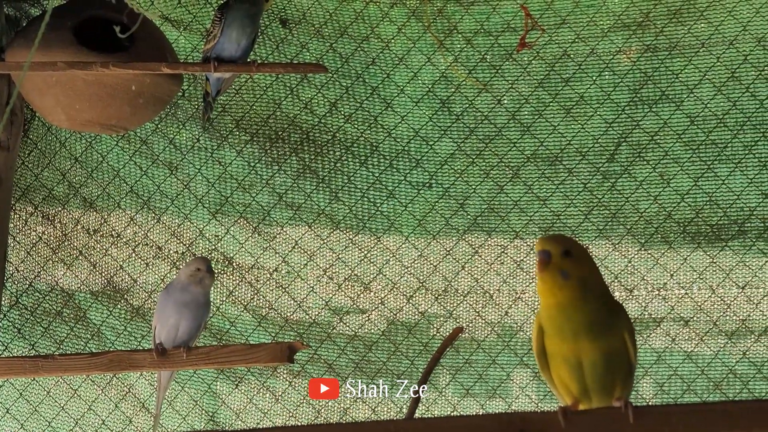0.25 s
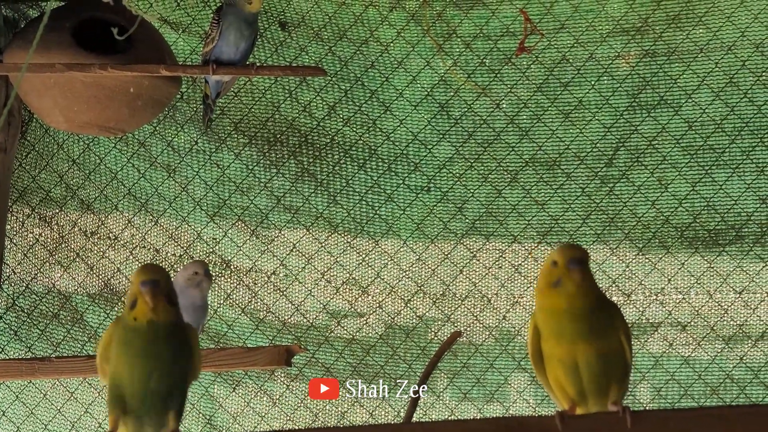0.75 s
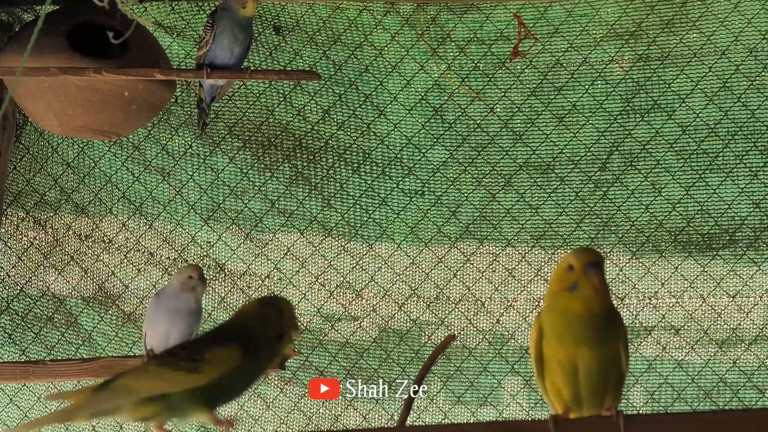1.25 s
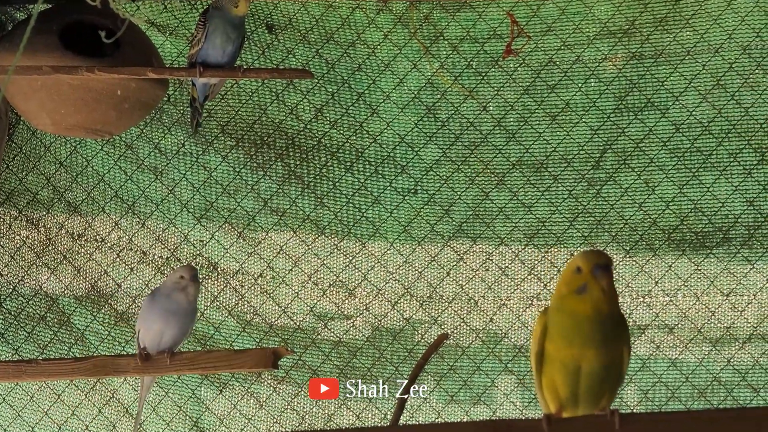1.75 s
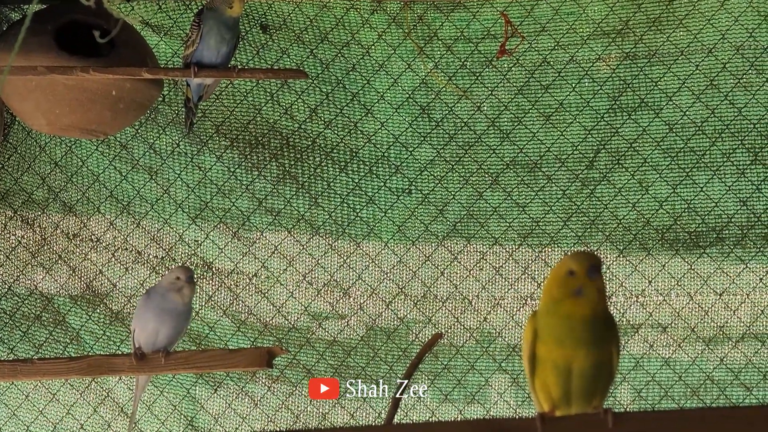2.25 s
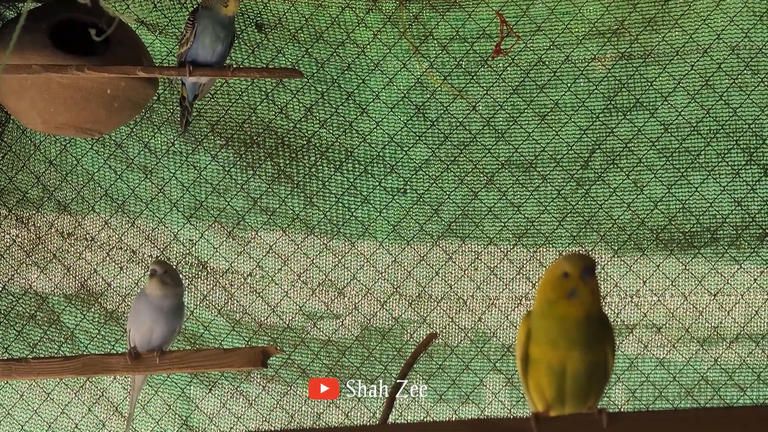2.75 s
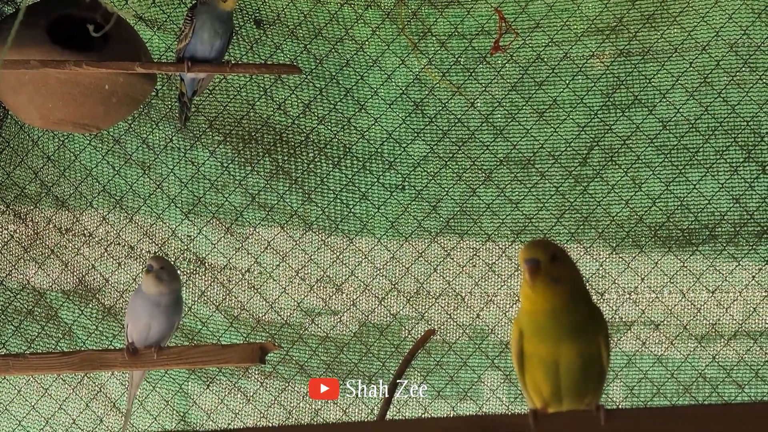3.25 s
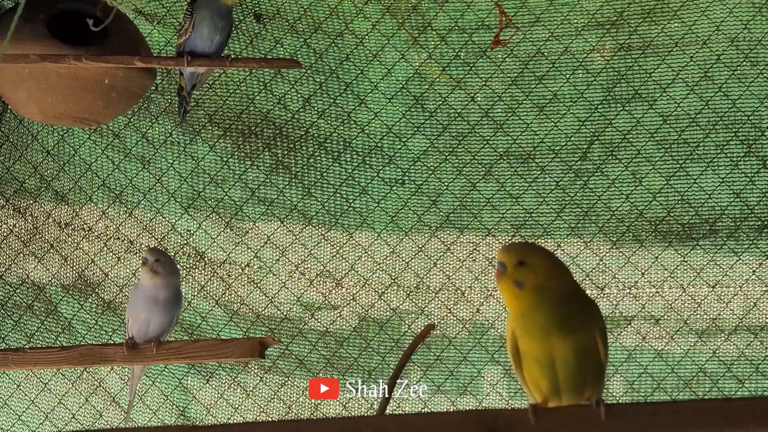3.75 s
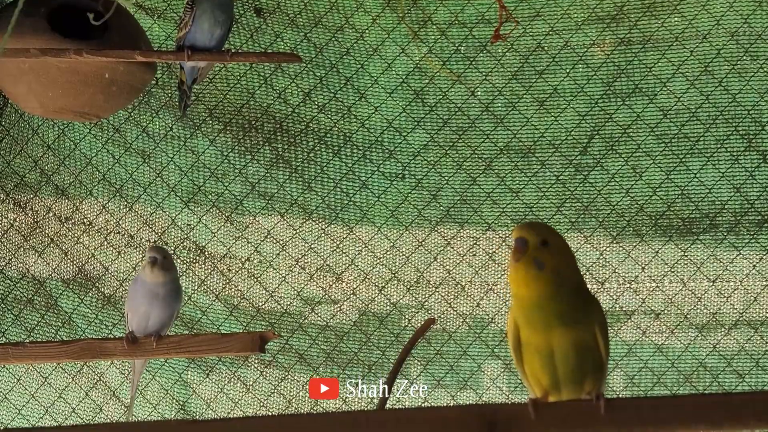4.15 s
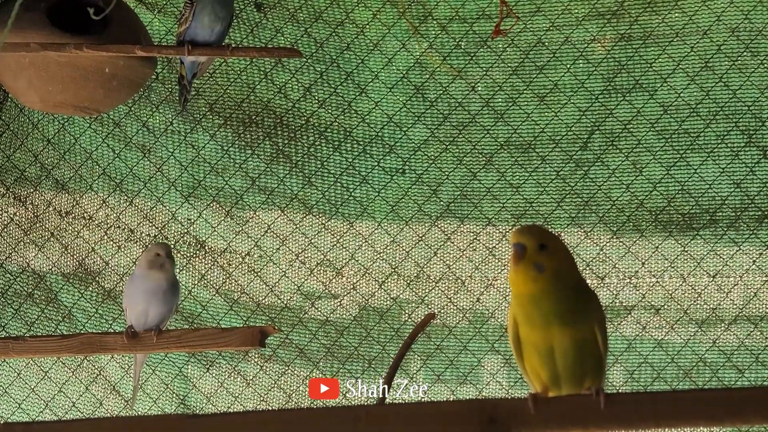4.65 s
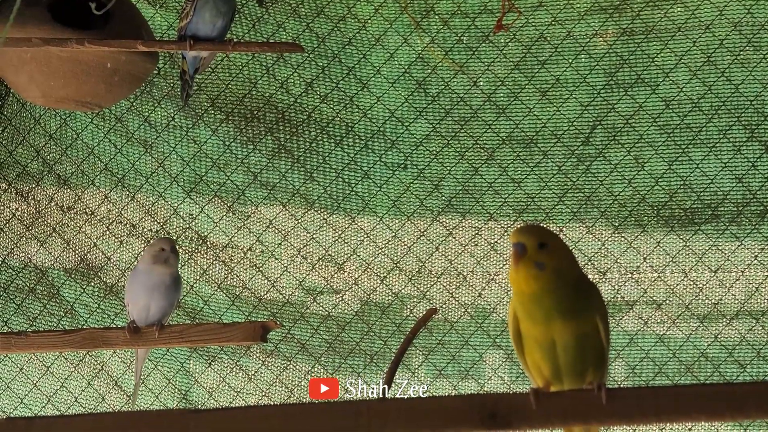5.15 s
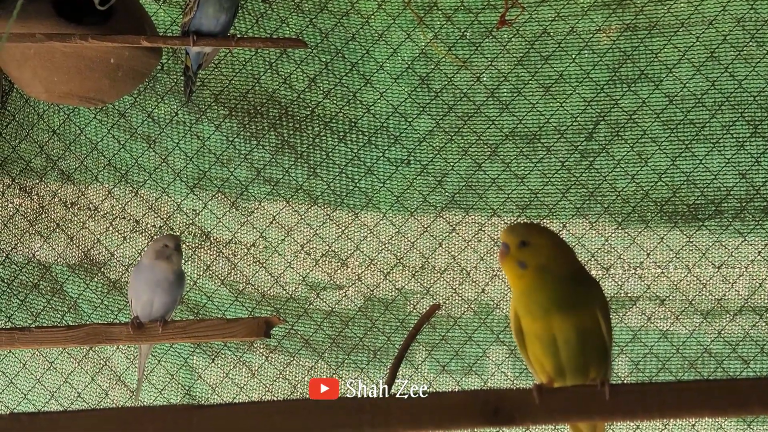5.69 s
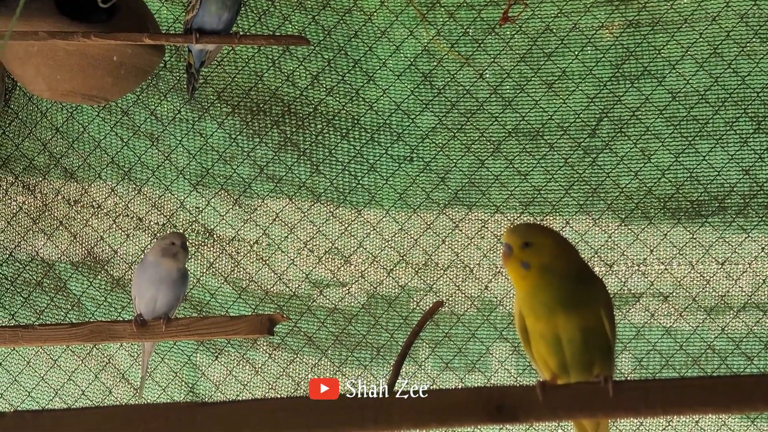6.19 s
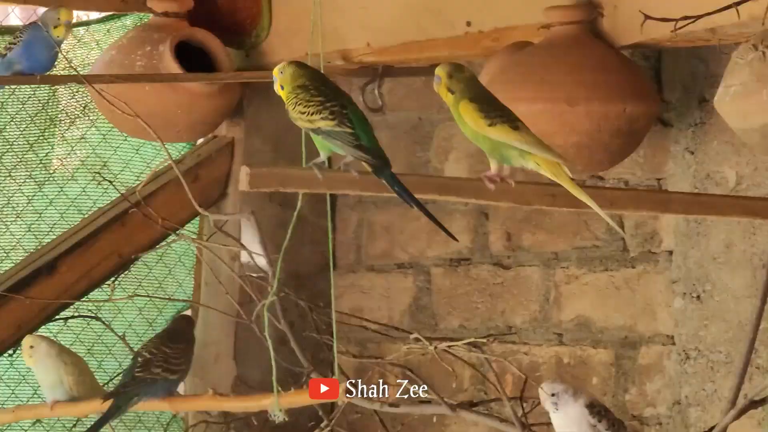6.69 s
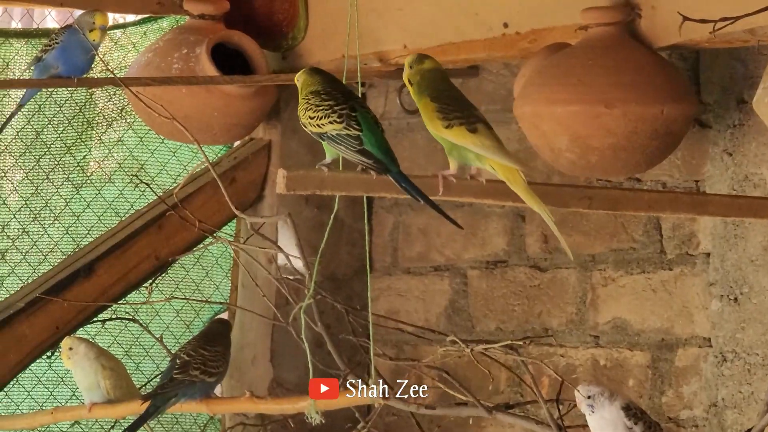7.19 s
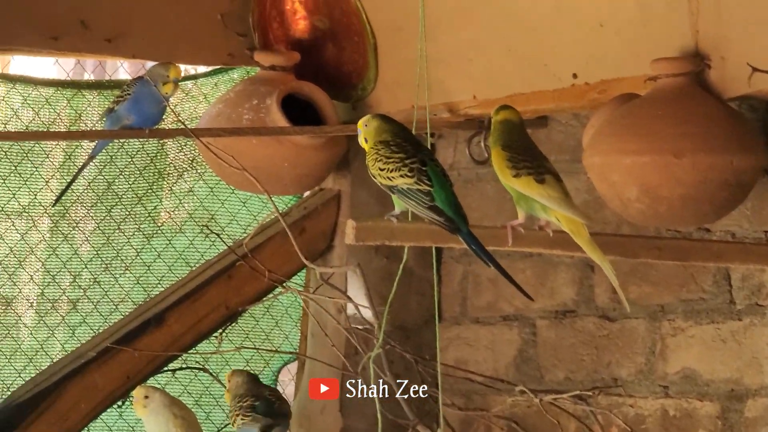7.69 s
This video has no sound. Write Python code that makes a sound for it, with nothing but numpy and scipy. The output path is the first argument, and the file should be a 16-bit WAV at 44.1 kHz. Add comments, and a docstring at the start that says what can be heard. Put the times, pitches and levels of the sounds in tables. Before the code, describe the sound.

Close, raspy budgerigar chirps come in two bursts, then thin out to distant chatter and a small bird's faint repeated piping.

```python
"""Budgerigars chirp close by in a netted aviary with brick walls.
Each chirp is a falling whistle that breaks into a rasp and clears into an arch; a few calls are
shriller squawks. Walls and perches throw them back. Other birds answer from further off, wings beat
and rustle, and a small bird pipes outside over a low outdoor rumble."""
import sys
import numpy as np
from scipy import signal
from scipy.fft import rfft, irfft, next_fast_len
from scipy.io import wavfile

SR = 44100
rng = np.random.default_rng(int(sys.argv[2]) if len(sys.argv) > 2 else 0)


def to_wav(sig):
    """Store sig (one row per channel, or 1-D mono) as 16-bit WAV at the path in sys.argv[1].

    Samples outside -1..1 are clipped; the rate is SR.
    """
    pcm = np.clip(np.atleast_2d(sig), -1, 1) * 32767
    pcm = np.round(pcm).astype(np.int16)
    wavfile.write(sys.argv[1], SR, pcm.T)  # frames by channels


N = 349713
TIME, FREQS = np.arange(N) / SR, np.fft.rfftfreq(N, 1 / SR)
PROGRESS = np.linspace(0, 1, 25)[1:-1]  # breakpoints along a note
# Resonances of a budgerigar's throat and beak: f/Hz, gain/dB
THROAT_EQ = [(900, -42), (1500, -17), (1950, 3), (2350, -1.5), (3000, 7), (4100, 0.5), (4900, -7),
             (6300, 3), (7600, -5.5), (9500, -6), (11000, -9), (13300, 6.5), (16000, 4)]


def amp(db):
    """Decibels to gain."""
    return 10 ** (np.asarray(db) / 20)


def unit(x):
    """Scales to rms 1."""
    return x / np.sqrt(np.mean(x ** 2) + 1e-20)


def read(points, hz):
    """Reads a spectrum on a log-frequency axis."""
    f, value = np.transpose(points)
    return np.interp(np.log(hz + 1), np.log(f + 1), value)


def follow(rows, t):
    """Reads every column of a breakpoint curve at the times t."""
    s, *columns = np.transpose(rows)
    return [np.interp(t, s, c) for c in columns]


def colour(x, gain):
    """Filters by a gain given at FREQS."""
    size = next_fast_len(N + 4096)
    curve = np.interp(np.fft.rfftfreq(size, 1 / SR), FREQS, gain)
    return irfft(rfft(x, size) * curve, size)[..., :N]


def wander(count, hz):
    """Smooth random motion of rms 1, up to about hz."""
    f = np.fft.rfftfreq(count, 1 / SR)
    return unit(irfft(rfft(rng.standard_normal(count)) * np.exp(-(f / hz) ** 2), count))


def add(mix, s, sound):
    """Mixes a sound in at time s."""
    part = mix[max(round(s * SR), 0):][:len(sound)]
    part += sound[:len(part)]


def arc(begin, middle, end):
    """A parabola through three values over the course of a note."""
    u = PROGRESS
    return begin + (end - begin) * u + 4 * u * (1 - u) * (middle - (begin + end) / 2)


def syrinx(gesture, overtones_db, flutter_hz=840, throb=0.37, jitter=0.0787, quiver=0.021):
    """A whistling membrane; in a rasp, uneven flutter swings pitch and level, throwing sidebands."""
    t = np.arange(gesture[0][0], gesture[-1][0], 1 / SR)
    hz, level_db, rough = follow(gesture, t)  # gesture rows: t/s, f/Hz, level/dB, roughness/0-1
    count = len(t)
    flutter = 2 * np.pi * np.cumsum(flutter_hz * (1 + 0.2536 * wander(count, 203.4))) / SR
    shaky_hz = hz * (1 + (quiver + jitter * rough) * wander(count, 283))
    phase = 2 * np.pi * np.cumsum(shaky_hz) / SR + 1.8 * rough ** 1.35 * np.sin(flutter)
    overtones = sum(amp(-7 * (k - 2)) * np.sin(k * phase + 0.27 * k * wander(count, 600))
                    for k in range(2, 6))
    purity_db = -10 * np.exp(-rough / 0.097)  # a clear whistle is nearly a sine
    tone = np.sqrt(2) * np.sin(phase) + amp(overtones_db + purity_db) * unit(overtones)
    tone *= 1 + throb * rough * np.cos(flutter)
    return t[0], amp(level_db) * tone * signal.windows.tukey(count, .03)


def slide(start, length, from_hz, level_db, end_hz=3122, attack_s=0.017):
    """Opening gesture: a whistle swells, falls fast, levels off and frays late."""
    t = length * PROGRESS
    hz = end_hz + (from_hz - end_hz) * (1 - PROGRESS) ** 2.1
    swell_db = -13.5 * np.exp(-t / attack_s)
    rough = .02 + .39 * PROGRESS ** 2.7
    return np.column_stack([start + t, hz, level_db + swell_db, rough])


def rasp(start, length, middle_hz, end_hz, level_db, break_hz=2722, warble_hz=50):
    """Middle gesture: the voice breaks and warbles, roughest and quietest halfway through."""
    t = length * PROGRESS
    warble = 1 + 0.075 * np.sin(2 * np.pi * warble_hz * (t - length / 2))
    hz = arc(break_hz, middle_hz, end_hz) * warble
    rough = arc(0.52, 0.736, 0.52)
    return np.column_stack([start + t, hz, level_db + arc(5.5, 0, 5.5), rough])


def arch(start, length, nominal_hz, level_db):
    """Closing gesture: the whistle rises and falls, loudest and clearest near its top."""
    hz = nominal_hz * arc(.8, 0.97, 0.7)
    rough = arc(0.28, 0.039, 0.28)
    return np.column_stack([start + length * PROGRESS, hz, level_db + arc(-3, 0, -4), rough])


def chirp(start, slide_s, rasp_s, arch_s, from_hz, middle_hz, end_hz, arch_hz,
          slide_db, rasp_db, arch_db, overtones_db):
    """Slide, rasp and arch, sung without a gap."""
    gesture = np.vstack([slide(start, slide_s, from_hz, slide_db),
                         rasp(start + slide_s, rasp_s, middle_hz, end_hz, rasp_db),
                         arch(start + slide_s + rasp_s, arch_s, arch_hz, arch_db)])
    return syrinx(gesture[gesture[:, 0] >= 0], overtones_db)


def aviary(x, lag, direct_db, early_db, tail_db):
    """Direct sound, hard reflections and a short diffuse tail; a positive lag delays the left side."""
    # Slaps off walls and perches: delay/s, signed gain
    echoes = [(.0041, .5), (.0093, -.5), (.0146, .45), (.0212, -.4), (.033, .3)]
    # Decay of the tail: f/Hz, T60/s
    decay_times = [(1000, 0.096), (2000, 0.29), (3100, 0.19), (4500, 0.26), (14000, 0.2)]
    t = np.arange(SR // 2) / SR
    taps = rng.choice([-1., 1.], (2, len(t)))
    taps *= (rng.random((2, len(t))) < .06) * (t > .006)  # sparse, after a pre-delay
    hz, frames, spectra = signal.stft(taps, SR, nperseg=256)
    decay = amp(-60 * frames / read(decay_times, hz)[:, None])
    tail = signal.istft(spectra * decay, SR, nperseg=256)[1][:, :len(t)]
    response = amp(tail_db) * tail / np.linalg.norm(tail, axis=1, keepdims=True)
    for channel, side in zip(response, (1, -1)):
        channel[max(side * lag, 0)] += amp(direct_db)
        for delay, gain in echoes:
            arrival = delay * (1 + lag / 100) * SR + side * 8 * gain  # shifts with perch and side
            channel[round(arrival)] += amp(early_db) * gain
    return signal.fftconvolve(x[None], response, axes=1)[:, :N]


def near_birds():
    """Each close call comes from its own perch, coloured by throat and beak."""
    # Every call's row ends with: overtones/dB, left lag/samples, pan to the left/dB
    # Chirps: t/s, slide/s, rasp/s, arch/s, slide start/Hz, rasp middle/Hz, rasp end/Hz,
    # nominal arch pitch/Hz, slide/dB, rasp/dB, arch/dB
    chirps = [ (-.045, 0.048, .044, .049, 3650, 3290, 2602, 3225, -18, -25.5, -19.5, -9, 2.5, .2),
              (0.54, 0.058, .034, .054, 3666, 3350, 2723, 3256, -18.5, -22, -19.5, -15, 7, -0.5),
              (1.278, 0.011, .033, 0.052, 3200, 2252, 2190, 3020, -32, -33.5, -28.5, -19, -1, 1),
              (2.944, .072, .064, .042, 3810, 3193, 2807, 3280, -21, -23, -18, -17.5, 0, 0.5),
              (3.279, 0.055, .044, 0.041, 3650, 3550, 2780, 3130, -22.5, -28.5, -22.5, -16.5, 17, 0),
              (3.785, .065, 0.052, 0.041, 4010, 3436, 2740, 3175, -20.5, -24, -17, -19, -15.5, 0.5),
              (7.088, .056, .04, 0.048, 3600, 3040, 2380, 3294, -25, -29.5, -26, -17.5, 1.5, 0), ]
    # A second bird screeches over the first chirp: t/s, length/s, from/Hz, to/Hz, level/dB, roughness
    screeches = [(0.086, .088, 3265, 3045, -24.5, 0.57, 3, 6, -1)]
    # Squawks climb to a shrill note and tumble through a rasp: rows of (t/s, f/Hz, level/dB, roughness)
    squawks = [ ([(.966, 3600, -38, 0), (.981, 4150, -27, .35), (.997, 2810, -22.5, 0.03),
               (1.014, 3630, -24.5, .6), (1.032, 2905, -42, 0.88), (1.047, 2320, -23, 0.98),
               (1.064, 2250, -36.5, 0.2), (1.08, 2860, -19, 0.22), (1.1, 3210, -25.5, 0.03),
               (1.112, 2550, -28, 0.4)], -19, -20, 0), ([(1.166, 3726, -41, 0.26),
               (1.188, 3934, -28.5, 0.89), (1.208, 4177, -22, 0.09), (1.226, 3820, -19.5, .55),
               (1.25, 3650, -27, 0.66), (1.261, 3183, -24, 0.42), (1.274, 3410, -22, 0.18),
               (1.288, 3090, -34, 0.7)], -15.5, -2, -0.53), ([(4.027, 3430, -27, 0), (4.035, 4300, -25, .2),
               (4.053, 3706, -23.5, 0.78), (4.076, 4315, -13, 0), (4.083, 3020, -23.5, 0.7),
               (4.096, 4203, -10, 0.38), (4.104, 3750, -25, 0.7), (4.113, 3955, -17.5, 0.55),
               (4.127, 3278, -12.5, 0.01), (4.16, 3204, -43.5, 0.88)], -17.5, -13, -.1), ]
    out = np.zeros((2, N))
    for voice, calls in ((chirp, chirps), (syrinx, squawks), (glide, screeches)):
        for *call, lag, pan_db in calls:
            start, sound = voice(*call)
            stereo = aviary(sound, round(lag), direct_db=-2, early_db=-5, tail_db=-3.5)
            stereo *= amp([[pan_db], [-pan_db]])
            for channel, heard in zip(out, stereo):
                add(channel, start, heard)
    return colour(out, amp(read(THROAT_EQ, FREQS)))


def outdoors(wash_db=-51, hiss_db=-53):
    """The bed: lumpy distant rumble, a mid wash and leaf hiss, with a wavering hum."""
    # Stereo image, near mono in the bass: f/Hz, left-right correlation
    image = [(60, 0.98), (150, 1), (380, 0.75), (950, -0.081), (2380, -0.17), (5980, 0.14), (15000, -0.51)]
    # Spectrum of the open air: f/Hz, density/dB
    air_eq = [(15, -36.5), (25, -6.5), (108, 6.5), (149, -5.5), (185, -5.5), (229, -18), (344, -16),
              (1010, -22), (1370, -13), (2830, -14), (4370, -20), (5420, -14.5), (7710, -25), (16000, -41)]
    # Fader ride on the rumble: t/s, level/dB
    rumble_ride = [(0.0, -46), (4.37, -49.5), (7.84, -47), (7.93, -53)]
    # Tones of the hum: f/Hz, level/dB
    hum_tones = [(102.3, -61.5), (344.5, -62)]
    rumble_trim_db, hum_trim_db = 1, -2
    correlation = np.clip(read(image, FREQS), -1, 1)
    mid = colour(rng.standard_normal(N), np.sqrt(1 + correlation))
    side = colour(rng.standard_normal(N), np.sqrt(1 - correlation))
    noise = np.array([mid + side, mid - side])
    low = 1 / (1 + (FREQS / 190) ** 8)
    high = 1 - 1 / (1 + (FREQS / 950) ** 8)
    rumble_db = follow(rumble_ride, TIME)[0] + rumble_trim_db + 2 * wander(N, 4.2)
    out = np.zeros((2, N))
    for band, level_db in ((low, rumble_db), (1 - low - high, wash_db), (high, hiss_db)):
        layer = colour(noise, amp(read(air_eq, FREQS)) * band)
        out += layer / np.std(layer.mean(0)) * amp(level_db)
    drift = 1 + 0.0156 * wander(N, 4.0)
    for hz, level_db in hum_tones:
        phase = 2 * np.pi * np.cumsum(hz * drift) / SR
        out += amp(level_db + hum_trim_db) * np.sqrt(2) * np.sin(phase)
    return out


def glide(start, length, from_hz, to_hz, level_db, rough, overtones_db):
    """A single note on a straight pitch ramp that swells and fades."""
    hz = from_hz + (to_hz - from_hz) * PROGRESS
    swell_db = level_db + arc(-15.5, 0, -15.5)
    gesture = np.column_stack([start + length * PROGRESS, hz, swell_db, np.full_like(hz, rough)])
    return syrinx(gesture, overtones_db)


def wings(beat_hz=17, cutoff_hz=560):
    """Each wingbeat pushes a soft, low puff of air."""
    # Birds in flight: start/s, end/s, level/dB
    flights = [(0.248, 0.6, -48), (1.31, 2.193, -53.5)]
    air = unit(colour(rng.standard_normal(N), 1 / (1 + (FREQS / cutoff_hz) ** 4)))
    swell = sum(amp(level_db) * np.sqrt(np.interp(TIME, [start, (start + end) / 2, end], [0, 1, 0]))
                for start, end, level_db in flights)
    return air * swell * (1 + 0.86 * np.sin(2 * np.pi * beat_hz * TIME))


def rustles(grain_db=3):
    """Feathers and claws brush net and perch: grainy noise that swells and dies."""
    # Wing rustles and perch scrapes: t/s, rise/s, T60/s, level/dB, tilt/(dB per octave)
    brushes = [(.49, 0.0047, .05, -44.5, 10.5), (2.673, 0.017, 0.55, -37.5, 1.5),
               (6.715, 0.014, 0.14, -56, 15), (7.338, 0.0036, 0.68, -39, 7.5), (7.35, 0.033, 1, -47, 11.5)]
    # Their shared tone colour: f/Hz, gain/dB
    brush_eq = [(300, 5.5), (800, -11), (1400, 1.5), (1950, 6.5), (2500, -1), (3500, 3), (4600, -8.5),
                (6300, -7.5), (8500, -27.5), (14000, -34)]
    out, t = np.zeros(N), np.arange(SR // 2) / SR
    hz = np.fft.rfftfreq(len(t), 1 / SR)
    for start, rise, t60, level_db, tilt_db in brushes:
        grains = rng.standard_normal(len(t)) * amp(grain_db * wander(len(t), 400))
        eq = amp(read(brush_eq, hz) + tilt_db * np.log2(np.maximum(hz, 500)))
        envelope = np.minimum(t / rise, 1) * amp(-60 * np.maximum(t - rise, 0) / t60)
        add(out, start, amp(level_db) * envelope * unit(irfft(rfft(grains) * eq, len(t))))
    return out


def piping_bird(second_db=-10, third_db=-9):
    """A small bird outside repeats one thin, arching whistle of three harmonics."""
    # Contour of the call: t/s from its top, f/Hz, level/dB
    tune = [(-.065, 4450, -11.5), (-.035, 4823, -6.5), (-.005, 6200, 0), (.015, 5890, -3.5),
            (.04, 4600, -6.5), (.07, 5530, -6), (0.106, 4810, -10.5)]
    # The top of each call: t/s, level/dB
    calls = [(1.631, -51.5), (2.155, -53), (2.673, -53.5), (3.19, -52), (3.699, -52.5), (4.225, -51),
             (4.755, -52.5), (5.255, -52), (5.755, -52.5), (6.269, -53), (7.689, -50)]
    out, t = np.zeros(N), np.arange(tune[0][0], tune[-1][0], 1 / SR)
    hz, envelope_db = follow(tune, t)
    for top_s, level_db in calls:
        phase = 2 * np.pi * np.cumsum(hz * (1 + 0.027 * wander(len(t), 260))) / SR
        tone = np.sin(phase) + amp(second_db) * np.sin(2 * phase) + amp(third_db) * np.sin(3 * phase)
        add(out, top_s + t[0], amp(level_db + envelope_db) * tone)
    return out


def far_birds():
    """Soft chatter from the far end of the aviary, coloured by throat and beak."""
    # Single notes: t/s, length/s, from/Hz, to/Hz, level/dB, roughness/0-1, overtones/dB
    notes = [ (5.144, 0.068, 1930, 2000, -46, 0.57, -28), (5.202, 0.029, 3750, 3500, -47.5, 0, -34),
             (5.226, 0.033, 3145, 2800, -44, 0.25, -28), (5.249, .38, 2910, 2885, -63.5, 0.11, -28),
             (5.92, 0.1, 2300, 1980, -54, 0.42, -25), (7.436, .08, 2650, 2597, -45.5, 0, -35),
             (7.699, 0.2, 3030, 3125, -48.5, 0.63, -10), (7.87, 0.063, 3780, 3040, -41.5, .35, -9), ]
    out = np.zeros(N)
    for note in notes:
        add(out, *glide(*note))
    return colour(out, amp(read(THROAT_EQ, FREQS)))


def scene():
    """Close calls up front, the other birds and wings a little wetter, all over the outdoor bed."""
    background = far_birds() + piping_bird() + rustles() + wings()
    far = aviary(background, lag=0, direct_db=-0.5, early_db=-2, tail_db=-1.5)
    return near_birds() + far + outdoors()


def record(dry, threshold_db=-30, squeeze=0.19, release_db_per_s=3, balance_db=0.93, cutoff_hz=15900):
    """Gain control ducks on loud chirps and recovers slowly; the image leans right; the top is cut."""
    power = signal.lfilter([.001], [1, -.999], (dry ** 2).mean(0))
    duck_db = squeeze * np.maximum(10 * np.log10(power + 1e-12) - threshold_db, 0)
    release_db = release_db_per_s * TIME
    duck_db = np.maximum.accumulate(duck_db + release_db) - release_db
    ducked = dry * amp(-duck_db) * amp([[-balance_db], [balance_db]])
    lowpass = signal.firwin(511, cutoff_hz, window=("kaiser", 9), fs=SR)
    return signal.oaconvolve(ducked, lowpass[None], "same")


dry = scene()
out = record(dry)
to_wav(out)
```